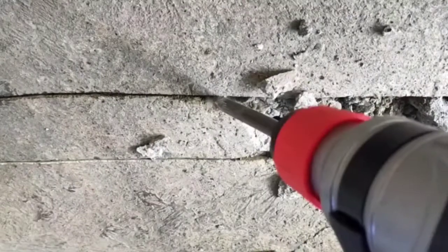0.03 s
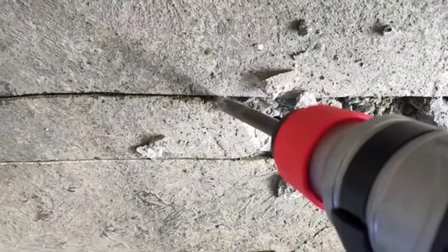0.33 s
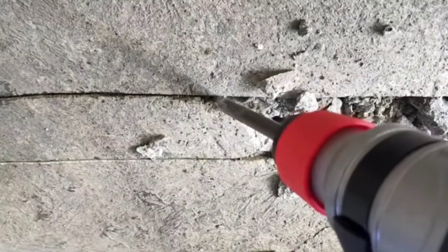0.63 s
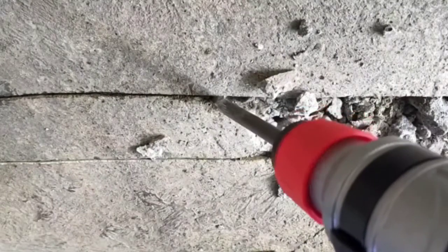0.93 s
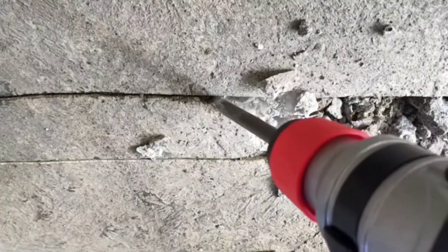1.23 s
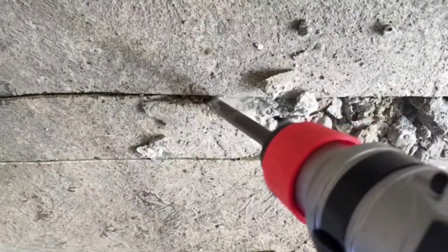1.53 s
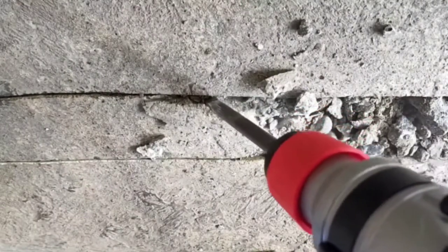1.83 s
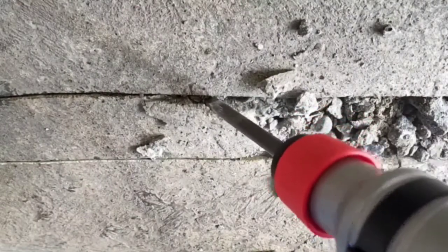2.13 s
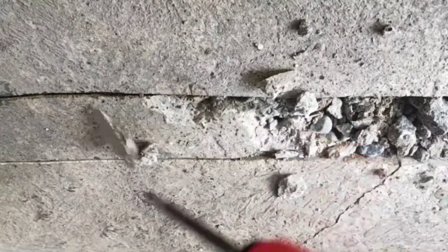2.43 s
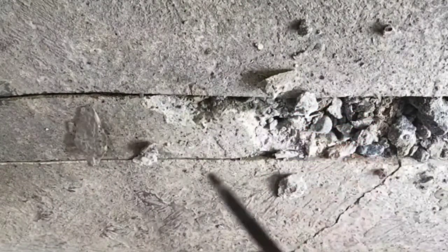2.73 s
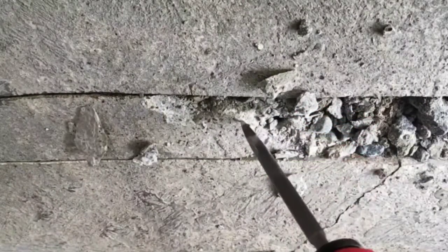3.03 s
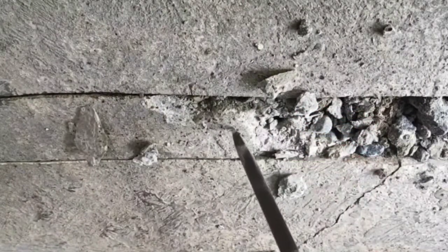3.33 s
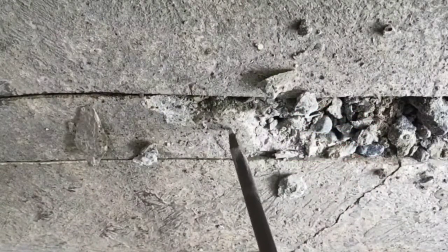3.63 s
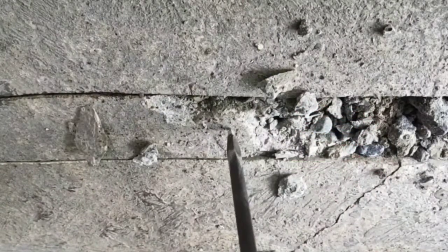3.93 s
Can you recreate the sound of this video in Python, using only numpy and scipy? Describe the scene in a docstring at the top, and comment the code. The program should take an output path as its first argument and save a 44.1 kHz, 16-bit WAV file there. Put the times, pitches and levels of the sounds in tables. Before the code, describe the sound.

An electric jackhammer hammers concrete close by, its rapid blows speeding and slowing with a bright high ring and low rumble. At about 2 seconds the blows stop and the motor whirs down in slowing swells until 3 seconds, while a few chips land. The chisel then taps and clinks on loose rubble, scraping faintly from 3.6 seconds, with a dull thump near 3.75 seconds.

```python
"""An electric jackhammer breaks a concrete slab close to the microphone, one blow per crank turn.
The crank surges and sags, and the shaking buffets the microphone. Each blow renews a bright high
ringing, coloured by microphone resonances; a narrow high ring lingers after the last blows.
The trigger is released: the blows stop and the motor coasts down in ever slower whirring swells.
Chips land, the chisel taps on loose rubble, and the tool is set down with a thump."""
import sys
import numpy as np
from scipy import signal
from scipy.fft import rfft, irfft, next_fast_len
from scipy.io import wavfile
from scipy.ndimage import map_coordinates

SR = 44100
rng = np.random.default_rng(int(sys.argv[2]) if len(sys.argv) > 2 else 0)


def pcm_store(signal):
    """Save signal as 16-bit PCM."""
    levels = np.round(np.clip(np.atleast_2d(signal), -1, 1) * 32767)
    wavfile.write(sys.argv[1], SR, levels.astype(np.int16).T)


N = 176400
RELEASE_S, REBOUND_S, LAST_BLOW_S = 1.965, 2.094, 2.17


def amp(db):
    """Decibels to gain."""
    return 10 ** (np.asarray(db) / 20)


def unit(x):
    """Scale to rms 1."""
    return x / np.sqrt(np.mean(x ** 2) + 1e-20)


def clock():
    """Sample times [s]."""
    return np.arange(N) / SR


def curve(rows):
    """(time [s], value) points as one value per sample."""
    return np.interp(clock(), *np.transpose(rows))


def colour(points, hz):
    """Gain at hz of a spectrum, interpolated in log frequency."""
    f, db = np.transpose(points)
    return amp(np.interp(np.log(hz + 1), np.log(f + 1), db))


def filtered(x, response):
    """Apply a frequency response."""
    size = next_fast_len(len(x) + 8192)
    return irfft(rfft(x, size) * response(np.fft.rfftfreq(size, 1 / SR)), size)[:len(x)]


def low_cut(x, hz):
    """Second-order high-pass."""
    return signal.sosfilt(signal.butter(2, hz, "high", fs=SR, output="sos"), x)


def noise(points):
    """Noise with the given spectrum, rms 1."""
    return unit(filtered(rng.standard_normal(N), lambda hz: colour(points, hz)))


def peak(f, hz, width_hz):
    """Resonance curve of height 1."""
    return 1 / (1 + np.square(2 * (f - hz) / width_hz))


def band(hz, width_hz):
    """Noise in one resonance, rms 1."""
    return unit(filtered(rng.standard_normal(N), lambda f: peak(f, hz, width_hz)))


def wobble(rate_hz):
    """Smooth random curve, rate_hz knots a second."""
    return map_coordinates(rng.standard_normal(N // 4), [clock() * rate_hz], mode="wrap")


def add(track, s, sound):
    """Mix a sound into the track at time s."""
    part = track[max(round(s * SR), 0):][:len(sound)]
    part += sound[:len(part)]


def powered():
    """1 while the trigger is held, then 0."""
    return np.clip((RELEASE_S - clock()) / 0.03 + .5, 0, 1)


# Crank speed (time [s], speed [turns/s])
CRANK_SPEED = [(0, 55), (.1, 46.1), (.25, 34.6), (.34, 29.6), (.39, 46.3), (.56, 59.4), (.61, 46),
               (.85, 29.9), (.93, 49.1), (1.07, 57.6), (1.14, 46.4), (1.37, 28.5), (1.48, 49.5),
               (1.57, 56.3), (1.7, 41.1), (1.91, 26.9), (2.06, 20.1), (2.13, 16.3), (2.43, 10.5),
               (2.72, 6.4), (3, 0)]


def crank():
    """Turns so far, blow times [s], and per sample the latest blow's index and age [s]."""
    t, turns = clock(), np.cumsum(curve(CRANK_SPEED)) / SR
    times = np.interp(np.arange(int(turns[-1])), turns, t)
    times = times[times < LAST_BLOW_S]
    latest = np.searchsorted(times, t, side="right") - 1
    return turns, times, latest, t - times[latest]


# Blow strength (time [s], level [dB])
BLOW_LEVEL = [(0, -37), (.22, -37.5), (.42, -40), (.66, -37), (.8, -39.5), (.88, -45), (.96, -39.5),
              (1.04, -37), (1.2, -37.5), (1.32, -39), (1.44, -40.5), (1.64, -37), (1.76, -39.5),
              (1.92, -38), (1.99, -42), (2.08, -34), (2.15, -40)]
# Crushed concrete (frequency [Hz], density [dB])
CONCRETE_SPECTRUM = [(53, -33), (90, 8.5), (128, -3), (202, 1), (481, -4), (1170, -4), (1310, -4.5),
                     (2420, -5), (5120, -14.5), (6610, -25.5), (8050, -15.5), (10000, -28.5), (13000, -52),
                     (22000, -120)]
# Initial crack (frequency [Hz], density [dB])
CRACK_SPECTRUM = [(100, -11), (1200, 1), (3500, 3), (6000, -8), (9500, -20), (13000, -4), (15600, 2.5)]
HOLD_S, FREE_HOLD_S, BLOW_FALL_DB_PER_S = .0045, .0015, 1900
RECOIL_S, RECOIL_DB = .0081, -6.5


def blows(knock_hz=1403, knock_t60_s=.031, crack_decay_s=.0012):
    """Each blow cracks and crushes concrete; under power the slab rings and the tip strikes twice."""
    _, times, latest, age = crank()
    power = powered()
    force_db = curve(BLOW_LEVEL) + 1.24 * rng.standard_normal(len(times))[latest]
    hold_s = FREE_HOLD_S + (HOLD_S - FREE_HOLD_S) * power
    strike = lambda u, held_s: (u >= 0) * amp(-BLOW_FALL_DB_PER_S * np.maximum(u - held_s, 0))
    recoil = power * amp(RECOIL_DB) * strike(age - RECOIL_S, hold_s / 2)
    pitch_hz = knock_hz * 2 ** (rng.standard_normal(len(times))[latest] / 2)
    knock = -power * amp(-3.5 - 60 * age / knock_t60_s) * np.sin(2 * np.pi * pitch_hz * age)
    crush = (strike(age, hold_s) + recoil) * amp(wobble(700)) * noise(CONCRETE_SPECTRUM)
    slowdown_octaves = np.log2(30 / np.maximum(curve(CRANK_SPEED), 21))
    fade = np.exp(-age / crack_decay_s)
    push = -1.2 * fade
    crack = (noise(CRACK_SPECTRUM) + push) * fade * amp(5 + 8 * slowdown_octaves)
    return amp(force_db) * (crush + knock + crack)


# Housing resonances (frequency [Hz], width [Hz], lift [dB])
HOUSING_MODES = [(930, 18, 3.5), (1234, 87, 8), (2390, 94, 9.5), (2633, 24, 7.5), (3340, 64, 2)]


def housing(x, share=1):
    """The housing's resonances colour sound from inside the tool; rms 1."""
    lift_db = lambda f: sum(db * peak(f, hz, width_hz) for hz, width_hz, db in HOUSING_MODES)
    return unit(filtered(x, lambda f: amp(share * lift_db(f))))


# Motor and crumbling (frequency [Hz], density [dB])
GRIND_SPECTRUM = [(60, -24), (400, -3), (1100, 0.5), (1600, -1.5), (2500, 0), (4000, -6), (5400, -12),
                  (7500, -4), (9500, -22.5), (15000, -30)]
# Grinding envelope (time [s], level [dB])
GRIND_LEVEL = [(0, -44), (.3, -44), (.62, -41), (.87, -46.5), (1.06, -41.5), (1.17, -45.5), (1.4, -47.5),
               (1.63, -41), (1.9, -45.5), (2.13, -51), (2.22, -52), (2.4, -100)]


def grinding():
    """Motor and grit grind under the blows."""
    return amp(curve(GRIND_LEVEL) + 2.05 * wobble(150)) * housing(noise(GRIND_SPECTRUM), share=0.61)


# High ringing envelope (time [s], level [dB])
RING_LEVEL = [(0.0, -40), (0.45, -41.5), (0.62, -39), (0.9, -43), (1.17, -38), (1.37, -41), (1.61, -38.5),
              (1.94, -42.5), (2.06, -56.5), (2.2, -76)]
# Ringing before the tip bites (frequency [Hz], density [dB])
RING_EARLY = [(3530, -25), (6000, -12.5), (6630, -26), (7330, -11), (8070, -6.5), (9130, -16),
              (9660, -17.5), (11400, -7.5), (13100, -9), (14600, 5.5), (15200, -1), (15600, -3)]
# Ringing after the tip bites (frequency [Hz], density [dB])
RING_LATE = [(3530, -38), (6000, -6.5), (6630, -31), (8100, -0.5), (9060, -14), (9850, -11.5), (10600, -8),
             (11700, -2), (13200, -1.5), (14500, 7.5), (15000, 5), (15600, 3)]
# High resonances (frequency [Hz], level [dB], t60 [s])
RING_MODES = [(8140, -20, .05), (11665, -18, .1), (11828, -17, .1), (14310, -16, .1), (14605, -12, .09),
              (14945, -16, .07)]
BITE_S, BITE_STEP_DB, RING_RISE_S, RING_FALL_DB_PER_S = 1.125, 14, .0041, 598


def high_ringing():
    """Each blow renews a bright ringing, coloured by microphone resonances near 8 and 14.6 kHz."""
    _, times, _, age = crank()
    t = clock()
    bite = np.clip((t - BITE_S) / 0.075 + .5, 0, 1)
    sizzle = np.sqrt(1 - bite) * noise(RING_EARLY) + np.sqrt(bite) * noise(RING_LATE)
    rise = 1 - np.exp(-age / RING_RISE_S)
    fall = amp(-RING_FALL_DB_PER_S * np.maximum(age - HOLD_S, 0))
    sizzle *= (0.94 + .5 * rise * fall) * amp(1.85 * wobble(250))
    hz, db, t60 = np.transpose(RING_MODES)[:, :, None]
    modes, u = np.zeros(N), t[:SR // 8]
    for s in times:
        scatter, phase = rng.standard_normal((2, len(RING_MODES), 1))
        partials = amp(db + 2.7 * scatter - 60 * u / t60) * np.sin(2 * np.pi * (hz * u + phase))
        add(modes, s, partials.sum(axis=0))
    level_db = curve(RING_LEVEL) + 1.8 - 200 * np.maximum(t - LAST_BLOW_S, 0)
    return amp(level_db) * (sizzle + amp(BITE_STEP_DB * (bite - .5)) * modes)


# Microphone buffeting (frequency [Hz], density [dB])
SHAKE_SPECTRUM = [(8, 5), (25, -6.5), (50, -4), (100, -17.5), (200, -18), (500, -35), (2000, -100)]


def shaking(level_db=-44, surge_db=2.5):
    """The working tool's jolts buffet the microphone in surges."""
    return amp(level_db + surge_db * wobble(12.6)) * powered() * noise(SHAKE_SPECTRUM)


# Background (frequency [Hz], density [dB])
AIR_SPECTRUM = [(15, -37), (25, 4), (48, -5.5), (113, -2), (179, -7), (270, -22.5), (1460, -19),
                (2640, -16), (4170, -23.5), (7900, -21.5), (9100, -31), (14400, -18.5)]


def air(level_db=-59):
    """Quiet, nearly steady background."""
    return amp(level_db + 0.35 * wobble(5.1)) * noise(AIR_SPECTRUM)


def lingering_ring(hz=14500, width_hz=310, fall_db_per_s=304):
    """A narrow high ring lingers after the last blows and the rebound."""
    t, age = clock(), crank()[3]
    age = np.where(t > REBOUND_S, np.minimum(age, t - REBOUND_S), age)
    gain = np.interp(t, [1.85, 1.95, 2.11, 2.14], [0, 0.9, 1, .4])
    return gain * amp(-39.5 - fall_db_per_s * age) * band(hz, width_hz)


# Struck stone (frequency [Hz], density [dB])
STONE_SPECTRUM = [(80, -6), (250, -5.5), (600, -3), (1250, 1.5), (1900, -9), (2700, -2.5), (3600, -8),
                  (5300, -17), (6150, -13), (6700, -10.5), (8300, -7), (10000, -24), (13000, -9.5),
                  (14600, -3.5), (15600, -10.5)]


def rebound(level_db=-40, t60_s=.13):
    """The chisel falls back on the stone after its last hard blow."""
    out = np.zeros(N)
    add(out, REBOUND_S, amp(level_db - 60 * clock() / t60_s) * noise(STONE_SPECTRUM))
    return out


# Coasting motor (frequency [Hz], density [dB])
WHIRR_SPECTRUM = [(180, -33), (430, -12), (601, -27), (733, 0), (836, -8), (950, 3), (1200, -2.5),
                  (1470, -6), (2370, -3.5), (2940, -3), (3240, -1.5), (5070, -16.5), (6710, -9.5),
                  (10800, -22), (14600, -15.5), (15600, -10)]
# Envelope of the swell tops (time [s], level [dB])
WHIRR_LEVEL = [(2.05, -75), (2.15, -47.5), (2.23, -40.5), (2.3, -39.5), (2.38, -42), (2.47, -42.5),
               (2.58, -45), (2.72, -49.5), (2.82, -51), (2.93, -62.5), (3.05, -71), (3.2, -100)]
TEETH_PER_TURN, SWELL_DB, SWELL_AT_TURN, SWELL_HALF_WIDTH_TURNS = 24.5, 7.5, .33, .33


def run_down():
    """Motor and gears coast in the housing, swelling once a turn as the piston compresses."""
    turns = crank()[0]
    offset = (turns - SWELL_AT_TURN + .5) % 1 - .5
    swell_db = SWELL_DB * (np.exp(-(offset / SWELL_HALF_WIDTH_TURNS) ** 4) - 1)
    clatter_db = 2.5 * np.cos(2 * np.pi * TEETH_PER_TURN * turns) + 1.5 * wobble(400)
    whirr = (noise(WHIRR_SPECTRUM) + amp(-3) * gear_whine(turns)) * amp(clatter_db)
    return amp(curve(WHIRR_LEVEL) + swell_db) * housing(whirr)


def gear_whine(turns, count=90):
    """Harmonics of half the tooth rate, falling with crank speed; rms 1."""
    cycles = TEETH_PER_TURN * turns / 2 + wobble(60) / 20
    orders = sum(np.cos(2 * np.pi * (k * cycles + p)) for k, p in enumerate(rng.random(count), 1))
    return unit(filtered(orders, lambda hz: colour(WHIRR_SPECTRUM, hz)))


# Chip landings (time [s], level [dB])
CHIP_HITS = [(2.309, -44), (2.413, -43), (2.461, -33), (2.519, -40)]
# Chip tick (frequency [Hz], density [dB])
CHIP_SPECTRUM = [(500, -22), (2500, -4), (6500, -6), (10000, -14), (14500, 3)]


def chips(t60_s=.02):
    """Chips knocked loose by the lifted tool land with bright ticks."""
    out, u = np.zeros(N), clock()[:SR // 10]
    for s, db in CHIP_HITS:
        add(out, s, amp(db - 60 * u / t60_s) * noise(CHIP_SPECTRUM)[:len(u)])
    return out


# Chisel on rubble (time [s], level [dB], tilt [dB/octave], t60 [s], thump [dB])
RUBBLE_TAPS = [(3.045, -49, -4.5, 0.081, -50.5), (3.17, -52.5, -3.5, 0.035, -61),
               (3.214, -53.5, -1.5, 0.065, -77), (3.369, -43.5, 0, 0.097, -54), (3.383, -40, 4, 0.048, -61),
               (3.443, -47.5, -2, 0.03, -61), (3.45, -42, -2.5, 0.025, -62), (3.469, -53.5, 0, 0.1, -45),
               (3.48, -49.5, -2, 0.078, -46), (3.75, -39, -2, 0.038, -27)]
# Tool body modes (frequency [Hz], level [dB], t60 [s])
BODY_MODES = [(138, -3, 0.1), (153.6, -8.5, 0.18), (272, -6.5, 0.04), (427, -30, 0.062), (641, -24, 0.19)]


def taps(crumbs_db=-11.5, crumbs_t60_s=.26, clink_db=-10.5):
    """The chisel knocks on loose stones: a gritty burst, settling crumbs, a clink, a body thump."""
    out, u = np.zeros(N), clock()[:SR // 3]
    body = -sum(amp(db - 60 * u / t60) * np.sin(2 * np.pi * hz * u) for hz, db, t60 in BODY_MODES)
    for s, db, tilt_db, t60, thump_db in RUBBLE_TAPS:
        grains = rng.standard_normal(len(u)) * amp(2.8 * wobble(895)[:len(u)])
        tilt = lambda hz: amp(tilt_db * np.log2(hz / 2000 + 0.09))
        stone = unit(filtered(grains, lambda hz: colour(STONE_SPECTRUM, hz) * tilt(hz)))
        fade = amp(-60 * u / t60) + amp(crumbs_db - 60 * u / crumbs_t60_s)
        add(out, s, amp(db) * (fade * stone + amp(clink_db) * clink(u)) + amp(thump_db) * body)
    return out


def clink(u, count=9, t60_s=.094):
    """A struck stone's few modes, different for every stone; rms 1 at the strike."""
    hz = np.geomspace(450, 4400, count)[:, None] * np.exp(0.118 * rng.standard_normal((count, 1)))
    modes = colour(STONE_SPECTRUM, hz) * np.sin(2 * np.pi * hz * u)
    return unit(modes.sum(axis=0)) * amp(-60 * u / t60_s)


# Stone creaks (time [s], level [dB], frequency [Hz])
PEBBLE_CREAKS = [(3.122, -53, 2900), (3.24, -56, 4300), (3.698, -50, 1500), (3.835, -53.5, 2400),
                 (3.897, -52, 1810)]


def pebbles(t60_s=.11):
    """Small stones shift and creak under the resting tip."""
    out, u = np.zeros(N), clock()[:SR // 10]
    swell = (1 - np.exp(-20 * u / t60_s)) * amp(-60 * u / t60_s)
    for s, db, hz in PEBBLE_CREAKS:
        creak = amp(db + 2.3 * wobble(460)) * band(hz, hz / 2)
        add(out, s, swell * creak[:len(u)])
    return out


# Free chisel modes (frequency [Hz], level [dB])
FREE_CHISEL_MODES = [(3505, -1.5), (6030, -6), (6220, 2.5), (9500, -5), (13080, -3)]


def chisel_ping(at_s=3.37, level_db=-45, t60_s=.064):
    """The free chisel pings at one clean strike."""
    out, u = np.zeros(N), clock()[:SR // 3]
    for hz, db in FREE_CHISEL_MODES:
        add(out, at_s, amp(level_db + db - 60 * u / t60_s) * np.sin(2 * np.pi * hz * u))
    return out


# Drag envelope (time [s], level [dB])
SCRAPE_LEVEL = [(3.5, -82), (3.56, -76), (3.61, -52), (3.68, -58), (3.72, -51.5), (3.9, -60.5), (4, -61)]
# Scraped dust (frequency [Hz], density [dB])
DUST_SPECTRUM = [(200, 1), (700, -13), (1100, 1.5), (1600, -5.5), (2500, -3.5), (5000, -12.5), (8000, -8.5),
                 (10000, -20), (14600, -9), (15600, 0.5)]


def scrape():
    """The tip drags through dust with a grainy hiss."""
    return amp(curve(SCRAPE_LEVEL) + 0.96 * wobble(39) + 2.8 * wobble(900)) * noise(DUST_SPECTRUM)


def scene():
    """Mono mix on two channels; without power the last blows thin to clacks."""
    background, power = air(), powered()
    impacts = blows() + rebound() + grinding()
    impacts = power * impacts + (1 - power) * low_cut(impacts, 550)
    tool = impacts + high_ringing() + lingering_ring() + shaking() + run_down()
    rubble = chips() + pebbles() + low_cut(taps() + chisel_ping(), 126) + scrape()
    mono = tool + rubble + background
    return np.array([mono, mono])


def record(dry, ceiling_db=-22, top_hz=15550):
    """Soft peak limiting, then a hard band limit."""
    rounded = dry / (1 + np.abs(dry / amp(ceiling_db)) ** 4) ** (1 / 4)
    return np.array([filtered(side, lambda hz: hz < top_hz) for side in rounded])


dry = scene()
out = record(dry)
pcm_store(out)
```